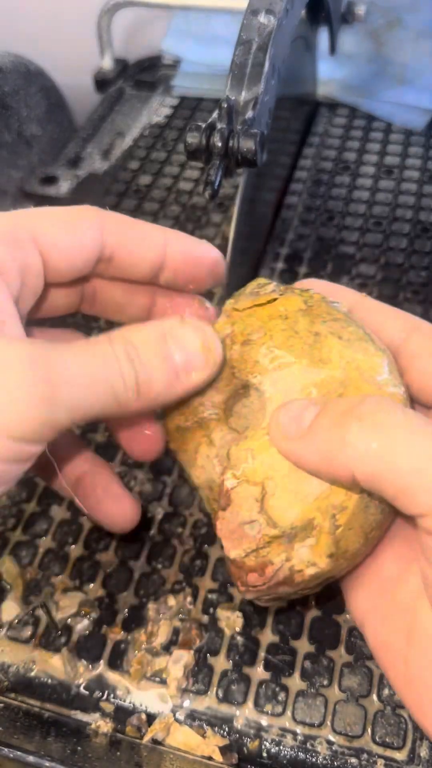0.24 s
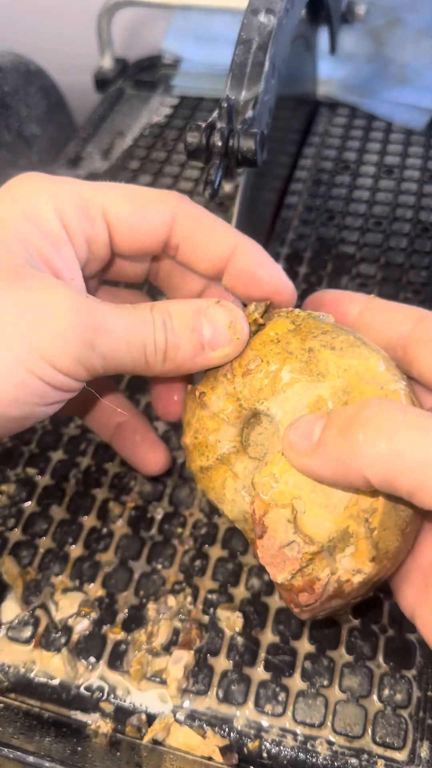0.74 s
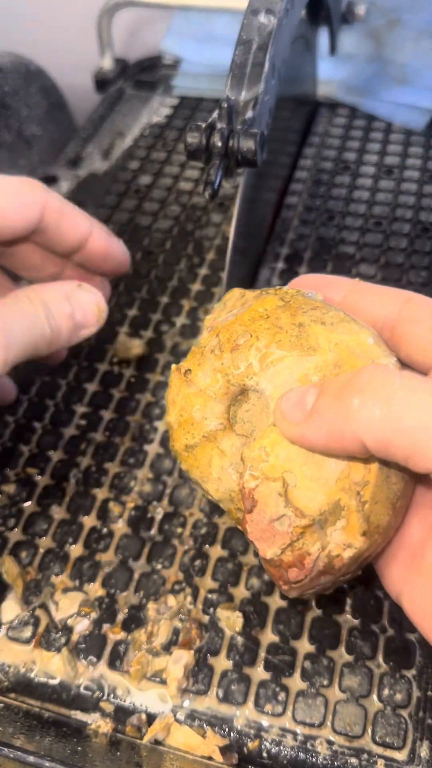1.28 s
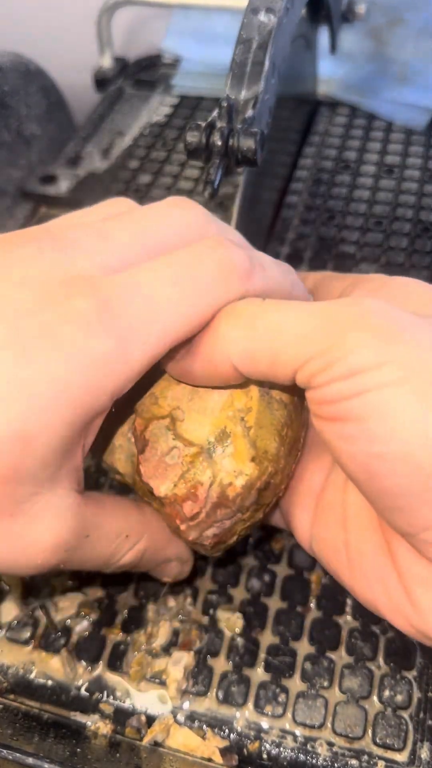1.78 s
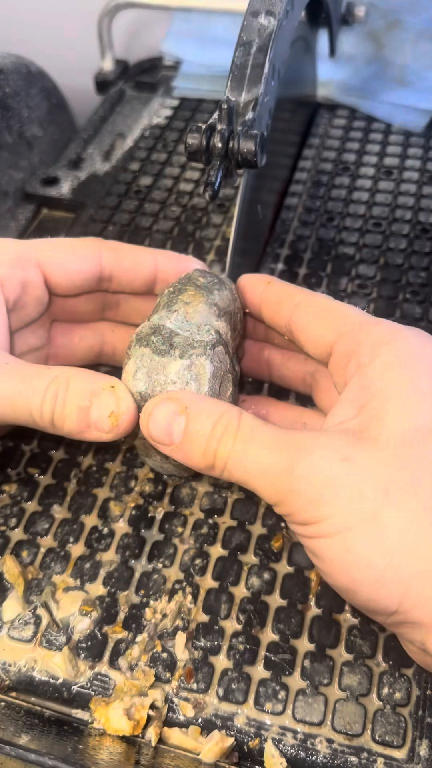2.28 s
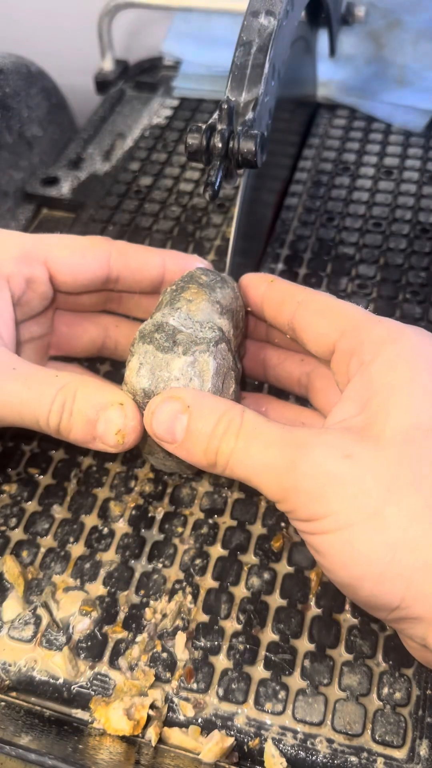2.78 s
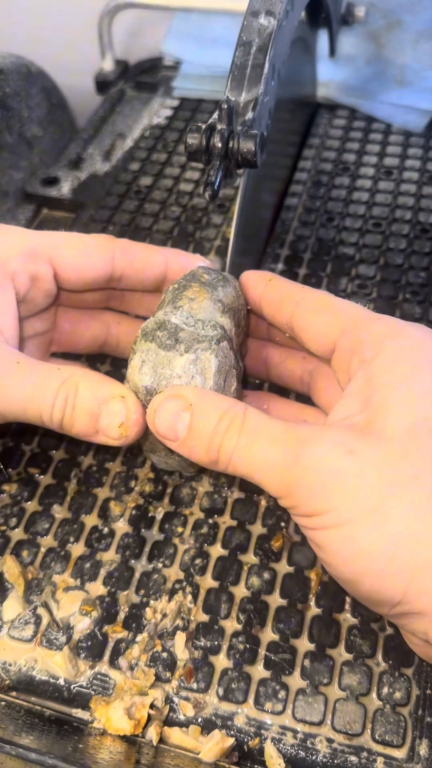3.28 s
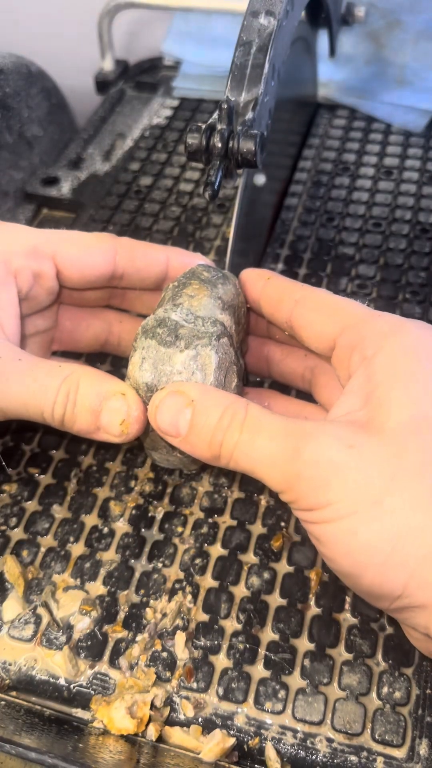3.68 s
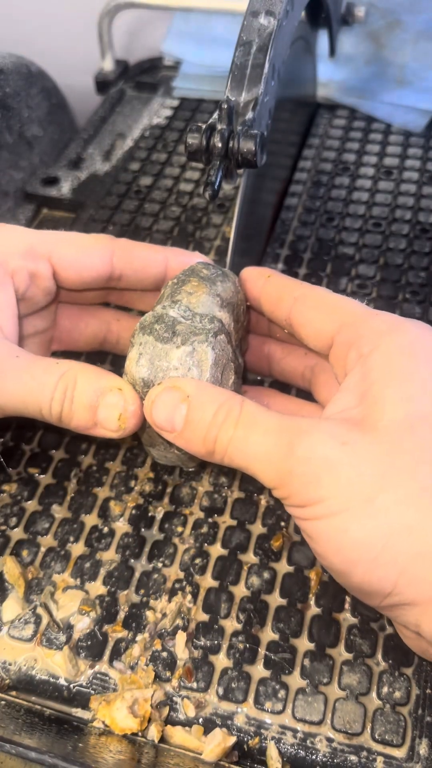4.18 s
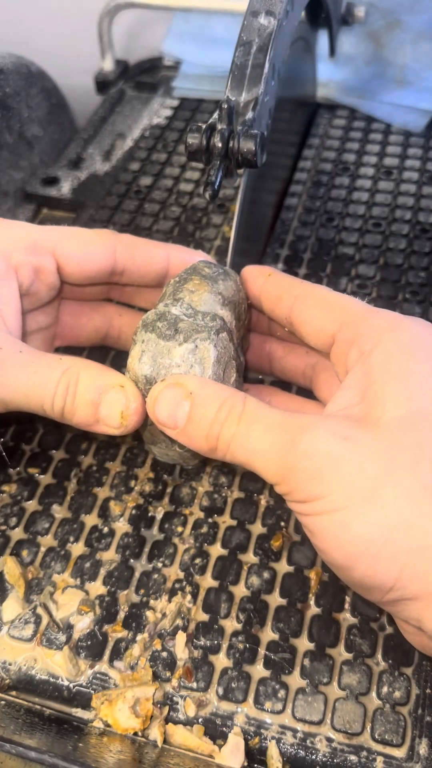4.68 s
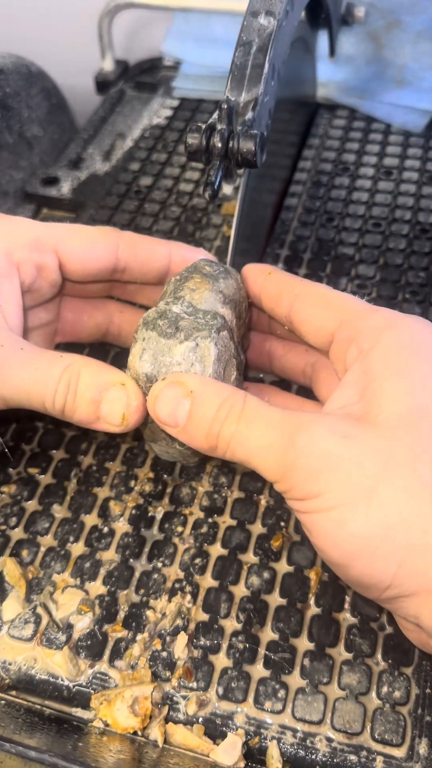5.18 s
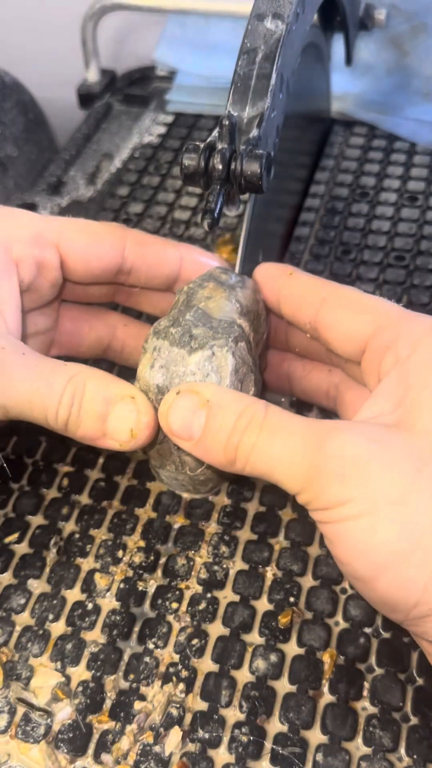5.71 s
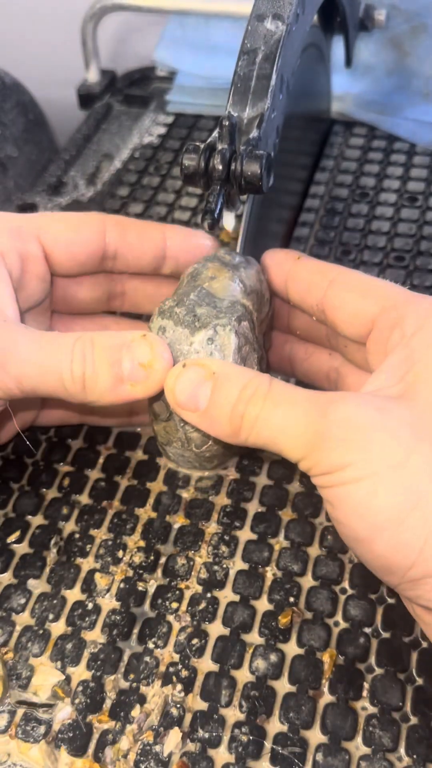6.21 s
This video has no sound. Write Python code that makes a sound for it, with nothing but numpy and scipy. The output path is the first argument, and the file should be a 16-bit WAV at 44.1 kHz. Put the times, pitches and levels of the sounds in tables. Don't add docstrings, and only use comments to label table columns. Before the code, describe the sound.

In a workshop, a wet saw idles quietly with low hum and thin water hiss. A small chip bounces on the tray. The view jumps closer, a stone thuds onto the table and meets the blade: snapping grains, pulsing rasp, then a loud steady growl with bright sizzle. It cuts abruptly to a close air scribe, whining hard and chattering on stone.

```python
import sys
import numpy as np
from scipy import signal
from scipy.fft import rfft, irfft, next_fast_len
from scipy.io import wavfile
from scipy.ndimage import uniform_filter1d, map_coordinates

SR = 44100
rng = np.random.default_rng(int(sys.argv[2]) if len(sys.argv) > 2 else 0)


def digitize_waveform(pressure):
    field = np.atleast_2d(pressure).T
    bounded = np.clip(field, -1, 1)
    quanta = np.round(bounded * 32767).astype(np.int16)
    wavfile.write(sys.argv[1], SR, quanta)


def gain_from_decibels(decibels):
    exponent = np.asarray(decibels, float) / 20
    return 10 ** exponent


N = 284445
T = np.arange(N) / SR
CUT_START_S, TOOL_CHANGE_S = 2.517, 5.232
BITE_S = 2.6
TURNS_PER_S = 29.72
# freq_hz, density_db
SIZZLE_SHAPE = [(9000, -29), (10000, -12.5), (11600, -12.5), (12400, -15), (13000, -7), (14000, -2.5),
                (15000, -6.5), (15700, -4)]


def unit(x):
    return x / np.sqrt(np.mean(x ** 2) + 1e-20)


def along(points, hz):
    f, v = np.transpose(points)
    return np.interp(np.log(hz + 1), np.log(f + 1), v)


def curves(rows):
    s, *cols = np.transpose(rows)
    return [np.interp(T, s, c) for c in cols]


def ramp(start_s, length_s):
    return np.clip((T - start_s) / length_s, 0, 1)


def wobble(knots_per_s):
    return map_coordinates(rng.standard_normal(int(N * knots_per_s / SR) + 4), [T * knots_per_s], order=1)


def filtered(x, response):
    m = next_fast_len(N + 8192)
    return irfft(rfft(x, m) * response(np.fft.rfftfreq(m, 1 / SR)), m)[..., :N]


def coloured(x, spectrum):
    return unit(filtered(x, lambda hz: gain_from_decibels(along(spectrum, hz))))


def patchy(depth_db):
    z = signal.stft(rng.standard_normal(N), nperseg=512)[2]
    field = uniform_filter1d(uniform_filter1d(rng.standard_normal(z.shape), 4, 0), 12, 1)
    return signal.istft(z * gain_from_decibels(depth_db * unit(field)), nperseg=512)[1][:N]


def ringing(x, modes):
    def response(hz):
        total = 0
        for k, (mode_hz, width_hz, db) in enumerate(modes):
            damping = 1j * hz * width_hz
            total = total + (-1) ** k * gain_from_decibels(db) * damping / (mode_hz ** 2 - hz ** 2 + damping)
        return total
    return unit(filtered(x, response))


def knocks(events, modes, crack, crack_s=.01):
    out, t = np.zeros(N + SR), np.arange(SR // 3) / SR
    onset = 1 - np.exp(-t / 0.00024)
    for s, db in events:
        ring = sum(gain_from_decibels(level + rng.normal(0, 3) - 60 * t / t60) * np.sin(2 * np.pi * hz * t)
                   for hz, level, t60 in modes)
        snap = crack * gain_from_decibels(-60 * t / crack_s) * rng.standard_normal(len(t))
        out[round(s * SR):][:len(t)] += gain_from_decibels(db) * onset * (ring + snap)
    return out[:N]


def ports(x, sum_gain, side_db, lean, spread_s):
    echo = rng.standard_normal(4096) * gain_from_decibels(-60 * np.arange(4096) / SR / spread_s)
    spectrum = rfft(echo, next_fast_len(N + 8192))
    echo_phase = spectrum / np.abs(spectrum)

    def smear(hz):
        in_phase = np.clip(along(lean, hz), -1, 1)
        return in_phase + np.sqrt(1 - in_phase ** 2) * echo_phase

    mid = filtered(x, lambda hz: gain_from_decibels(along(sum_gain, hz)))
    side = filtered(x, lambda hz: gain_from_decibels(along(side_db, hz)) * smear(hz))
    return np.array([mid - side, mid + side])


def idle():
    # freq_hz, level_db
    motor_lines = [(59.2, -63.5), (91.5, -76), (118.4, -96), (150.7, -50), (209.9, -58), (296.1, -60),
                   (613.7, -64), (850.6, -76), (1104, -69.5), (1314, -68)]
    # time_s, level_db
    hum_path = [
        [(0.0, -45), (0.04, -47), (0.49, -52), (1.38, -41.5), (2.02, -43), (2.07, -47)],
        [(2.077, -33), (2.103, -32.5), (2.85, -27.5)],
    ]
    # time_s, freq_hz, level_db
    bearing_path = [(1.2, 1253, -71), (1.634, 1259, -60.5), (2.264, 1230, -62), (2.5, 1270, -67)]
    # freq_hz, density_db
    frame_shape = [(22, -31), (40, -8), (70, -0.5), (120, 2.5), (200, 4), (300, -3), (420, -1), (620, -6.5),
                   (700, -10.5), (850, -5), (1000, -14.5), (1300, -10), (2500, -19.5), (3300, -26)]
    # freq_hz, density_db
    spray_shape = [(1200, -34), (2000, 0), (3300, -3.5), (4200, -3.5), (7500, -2.5), (8300, -2),
                   (10000, -0.5), (15700, -1.5)]
    jump_s, creep_db_per_s = 2.074, 1.5
    spray_db = np.where(T < jump_s, -54.5 + creep_db_per_s * T, -38)
    frame_db = np.where(T < jump_s, -52.5 + creep_db_per_s * T, -37.5)
    hum_hz = 150.8
    hum_db = curves(np.vstack(hum_path))[0] - 12 * ramp(3.3, 0.44)
    hum = gain_from_decibels(hum_db + 2.5 + .5 * wobble(20)) * np.sin(2 * np.pi * hum_hz * T)
    lines = np.zeros(N)
    for hz, db in motor_lines:
        if abs(hz - hum_hz) > 5:
            lines += gain_from_decibels(db + 2.0 * wobble(5.93)) * np.sin(2 * np.pi * hz * T + rng.uniform(0, 5.4))
    hz, db = curves(bearing_path)
    whistle = gain_from_decibels(db + 6.5 + wobble(12.0)) * ramp(0.99, 0.18) * np.sin(2 * np.pi * np.cumsum(hz) / SR)
    frame = gain_from_decibels(frame_db) * (gain_from_decibels(53.5) * lines + coloured(patchy(depth_db=1.2), frame_shape))
    spray = gain_from_decibels(spray_db) * coloured(patchy(depth_db=1.5), spray_shape)
    return hum + whistle + frame + spray


def handling():
    # start_s, peak_db
    bounces = [(0.871, -52), (1.134, -28.5), (1.141, -33), (1.149, -36), (1.164, -37), (1.209, -42),
               (1.219, -35), (1.244, -40), (1.289, -43), (1.299, -41)]
    # freq_hz, level_db, t60_s
    tray_modes = [(262, -0.5, 0.057), (530, -1, 0.086), (765, 5, 0.089), (1155, 6.5, 0.036),
                  (1400, 7, 0.03), (2020, 6, .04), (2280, -12, .04), (3060, -16, .03)]
    # freq_hz, gain_db
    dull_contact = [(150, 9), (300, 7), (2300, -4), (4500, -18), (8000, -28)]
    # start_s, level_db
    laid_down = [
        (2.08, -29.5),
        (2.112, -20.5),
        (2.125, -20),
    ]
    # freq_hz, level_db, t60_s
    table_modes = [(186, -7, 0.25), (260, -7.5, 0.1), (373, -12.5, 0.047), (580, -13, 0.085),
                   (2600, -21, 0.03)]
    # start_s, level_db
    pushes = [
        (2.97, -13),
        (3.03, -22),
        (3.36, -33),
        (4.23, -39),
        (5.22, -45),
    ]
    chip = knocks(bounces, tray_modes, crack=3.5, crack_s=0.12)
    chip = filtered(chip, lambda hz: gain_from_decibels(along(dull_contact, hz) - 15.0))
    chip += knocks([(1.243, -58), (1.247, -60)], [(2900, 0, .03), (4030, -2, .02)], crack=.5)
    stone = knocks(laid_down, table_modes, crack=0.18, crack_s=0.044)
    return chip + stone + knocks(pushes, [(32.1, 1, 0.046), (55.5, -22, .1)], crack=0)


def table_growl(growl_db, rattle_db, speed, turn, strike):
    # freq_hz, density_db
    growl_shape = [(24, -59), (40, -44), (59, -35), (193, 0.5), (242, -2), (322, -12.5), (340, -9.5),
                   (440, -12), (750, -120)]
    rattle_shape = [(190, -28), (320, -2.5), (442, -12), (540, 1.5), (664, -12), (1090, -13.5),
                    (1500, -17.5), (1950, -54), (3300, -120)]
    order_levels = [-57, -13.5, -7.5, -12.5, -3, 1, -4.5, -8, -9.5, -20, -10, -10, -13.5, -15, -9, -7.5,
                    -11.5, -11.5, -14]
    # time_s, freq_hz
    stone_paths = [
        [(3.5, 150), (3.57, 236), (4.45, 236), (4.5, 178), (4.78, 178), (4.81, 265)],
        [(3.45, 531), (3.55, 413), (4.2, 413), (4.23, 522), (4.78, 522), (4.81, 558)],
    ]
    # freq_hz, width_hz, level_db
    boom_modes = [(178.3, 17, 4.5), (210, 27, 1.5)]
    rough_share, smooth_share = .9, .23
    rough = smooth_share + (rough_share - smooth_share) * np.exp(-np.maximum(T - 3.45, 0) / .2)
    stone_hz = [curves(path)[0] for path in stone_paths]

    def lift_db(k):
        return sum(db * np.exp(-((k * speed - hz) / 20) ** 2) for db, hz in zip((5, 8), stone_hz))

    def order(k):
        phase = k * turn + rng.uniform(0, 2 * np.pi) + .45 * wobble(4)
        return gain_from_decibels(2.3 * wobble(5)) * np.cos(phase)

    def grind():
        return np.sqrt(rough) * unit(gain_from_decibels(2.1 * strike) * patchy(depth_db=2.0))

    low = sum(gain_from_decibels(db + lift_db(k)) * order(k) for k, db in enumerate(order_levels, start=2))
    low = low / np.sqrt(np.abs(uniform_filter1d(low ** 2, SR // 4)))
    high = unit(sum(order(k) for k in range(21, 48)))
    tonal = 1.295 * np.sqrt(1 - rough) * low
    noise = 0.51 * coloured(grind(), growl_shape)
    boom = 0.44 * (rough - smooth_share) / rough_share * ringing(grind(), boom_modes)
    rattle = coloured(grind() + 0.32 * np.sqrt(1 - rough) * high, rattle_shape)
    return gain_from_decibels(growl_db) * (tonal + noise + boom) + gain_from_decibels(rattle_db - 6.5) * rattle


def blade_grit(grit_db, feed_db, grains, depth):
    # freq_hz, density_db
    grit_shape = [(530, -11), (900, 0), (1090, -1), (1830, -8), (2040, -11.5), (2600, -2.5), (2840, -5),
                  (3500, -6.5), (4680, -10.5), (5220, -8), (9800, -7), (12700, -39), (21600, -120)]
    # freq_hz, width_hz, level_db
    blade_modes = [(2045, 50, 0), (2250, 25, -1), (2500, 30, -3), (2695, 15, 3), (3430, 60, -3),
                   (4460, 25, -1), (5072, 35, -4), (5400, 50, -4), (6020, 25, -2), (6140, 20, -1),
                   (6420, 20, -2), (6930, 40, -3), (7065, 18, 1), (8090, 30, -3)]
    bite_db = 1 * (T > BITE_S) * np.exp(-np.abs(T - BITE_S) / 0.046)
    blade = 0.88 * gain_from_decibels(-6 * depth + 1 * wobble(3.05)) * ringing(grains, blade_modes)
    grit = gain_from_decibels(grit_db + bite_db - 1.5) * (coloured(grains, grit_shape) + blade)
    coarse = filtered(grit, lambda hz: 1 / (1 + (hz / 1680) ** 6))
    return grit + (gain_from_decibels(0.16 * feed_db) - 1) * coarse


def rim_sizzle(sizzle_db, turn, strike, throb_db, skim):
    # freq_hz, width_hz, level_db
    rim_modes = [(12070, 60, -9), (12750, 50, -4), (13010, 50, -2), (13160, 50, -2), (13520, 70, -5),
                 (13850, 50, -2), (14020, 60, 1), (14330, 50, -5), (14620, 80, -5), (15040, 60, -5),
                 (15630, 60, -5)]
    lead_s, lead_db = .011, 1.8
    lead = 1 - np.mod(turn + 2 * np.pi * TURNS_PER_S * lead_s, 2 * np.pi) / (2 * np.pi)
    fine_db = throb_db * (0.31 * strike + lead_db * lead) + 0.83 * wobble(300)
    fine = gain_from_decibels(fine_db) * patchy(depth_db=2.0)
    fine = fine / np.sqrt(np.abs(uniform_filter1d(fine ** 2, SR // 8)))
    hiss = coloured(fine, SIZZLE_SHAPE) + .5 * ringing(fine, rim_modes)
    return gain_from_decibels(sizzle_db + 0.5 - 2 * skim) * hiss


def blade_sing(depth):
    # freq_hz, level_db, peak_s, rise_s, fade_db_per_s
    hz, db, peak_s, rise_s, fade_db_per_s = (2034, -29, 2.545, .025, 12)
    fade_db = fade_db_per_s * np.maximum(T - peak_s, 0) + 5 * ramp(BITE_S, 0.11) + 12 * depth
    sing_db = db - fade_db + 3.0 * wobble(45.27)
    return gain_from_decibels(sing_db) * ramp(peak_s - rise_s, rise_s) * np.sin(2 * np.pi * hz * T + 1.1 * wobble(70))


def guard_buzz(grains, skim):
    # freq_hz, width_hz, level_db
    guard_modes = [(611, 14, 0)]
    return gain_from_decibels(-37) * skim * ramp(CUT_START_S, 0.041) * ringing(grains, guard_modes)


def torn_grains():
    # start_s, peak_db
    snap_events = [(2.5202, -24), (2.555, -4), (2.5796, -9), (2.612, -2), (2.655, 3), (2.6889, -7),
                   (2.7232, 2), (2.7567, -7), (2.7804, -1), (2.8211, -8), (2.848, -9), (2.88, -7),
                   (2.9139, -6), (2.9338, -2)]
    snaps = knocks(snap_events, [(13700, -4, 0.011)], crack=1.1, crack_s=0.017)
    return filtered(snaps, lambda hz: gain_from_decibels(along(SIZZLE_SHAPE, hz)))


def cutting():
    # time_s, pressure_db
    feed_path = [(2.52, -16.5), (2.6, -15.5), (2.7, -12), (2.81, -11), (2.85, -2), (2.92, -0.5), (3.3, 3),
                 (3.55, 1.5), (4.15, -4), (4.25, 1), (5.07, -2), (5.22, -0.5)]
    # level_db, pressure_share, change_by_end_db
    layers = [
        (-17, 0.95, -0.5),
        (-19, 0.96, -2.5),
        (-23, 0.34, -5.5),
        (-14.5, 0.32, -2.5),
    ]
    feed_db, = curves(feed_path)
    progress = ramp(CUT_START_S, TOOL_CHANGE_S - CUT_START_S)
    growl_db, rattle_db, grit_db, sizzle_db = [db + share * feed_db + end_db * progress
                                               for db, share, end_db in layers]
    speed = TURNS_PER_S - .15 * (T - CUT_START_S)
    turn = 2 * np.pi * np.cumsum(speed) / SR
    turn = turn - turn[round(2.657 * SR)]
    strike = np.cos(turn) + .35 * np.cos(2 * turn - .6) + .3 * wobble(30)
    skim = np.exp(-np.maximum(T - 2.9, 0) / .15)
    throb_db = 1.4 + 5.6 * skim
    depth = ramp(3.32, 0.74)
    grains = gain_from_decibels(.3 * throb_db * strike + 1.5 * wobble(400)) * patchy(depth_db=1.6)
    saw = table_growl(growl_db, rattle_db, speed, turn, strike)
    saw = saw + blade_grit(grit_db, feed_db, grains, depth)
    saw = saw + rim_sizzle(sizzle_db, turn, strike, throb_db, skim)
    saw = saw + blade_sing(depth) + guard_buzz(grains, skim)
    return saw * ramp(CUT_START_S - .004, 0.0037) + torn_grains()


def scribe():
    # time_s, sixth_overtone_hz, level_db
    whine_path = [(5.232, 1759, -18.5), (5.264, 1753, -19), (5.37, 1744, -19), (5.43, 1744, -18),
                  (5.588, 1735, -19), (5.64, 1742, -20), (5.965, 1756, -19), (6.0, 1755, -22.5),
                  (6.04, 1775, -27.5), (6.066, 1768, -18.5), (6.085, 1755, -20), (6.326, 1731, -16.5),
                  (6.365, 1757, -18.5), (6.4, 1743, -17.5), (6.45, 1728, -17)]
    # freq_hz, level_db
    exhaust_shape = [(6400, -34), (8000, -21.5), (10000, -29.5), (12000, -27), (14000, -31.5),
                     (15700, -33.5)]
    # freq_hz, density_db
    chatter_shape = [(250, -90), (400, -39), (650, -25), (1300, -16), (1500, -4), (1800, 0.5), (2600, -3),
                     (3300, -9), (5200, -4), (6300, -14), (9000, -14), (12000, -19.5), (14000, -19),
                     (15700, -28)]
    scrape_shape = [(300, -90), (700, -28), (1300, -10), (1600, 0), (2600, -2), (3200, -20), (5000, -18),
                    (6500, -26), (15700, -34)]
    # start_s, chatter_db, high_overtones_db
    passes = [
        (5.635, -14.5, -7),
        (6.06, -18, -4),
    ]
    # time_s, scrape_db, half_length_s
    skids = [
        (6.025, 0, .042),
        (6.366, -6, .02),
    ]
    # start_s, level_db
    catches = [
        (6.004, -27),
        (6.016, -27),
        (6.056, -30),
        (6.078, -23),
    ]
    # start_s, level_db
    hose_drags = [
        (5.33, -83),
        (5.37, -84),
        (5.53, -82),
    ]
    # multiple, level_db
    loose_db = [(1, -42), (2, -29), (3, -16), (4, -15), (5, -16), (6, 0), (7, -1), (8, -11), (9, -9),
                (10, -16), (11, -24), (12, -13), (13, -5), (14, -12), (15, -16), (16, -9), (17, -16),
                (18, -19), (19, -8), (20, -10), (21, -25), (22, -19)]
    free_db = [(1, -51), (2, -29), (3, -21), (4, -14), (5, -17), (6, 0), (7, -3), (8, -10), (9, -11),
               (10, -14), (11, -17), (12, -16), (13, -13), (14, -17), (15, -21), (16, -10), (17, -18),
               (18, -22), (19, -22), (20, -12), (21, -31), (22, -24)]
    cutting_db = [(1, -56), (2, -27), (3, -16), (4, -15), (5, -9), (6, 0), (7, -2), (8, -6), (9, -12),
                  (10, -18), (11, -16), (12, -22), (13, -20), (14, -19), (15, -24), (16, -25), (17, -11),
                  (18, -14), (19, -21), (20, -17), (21, -32), (22, -32)]
    second_pass_db = [(1, -58), (2, -23), (3, -23), (4, -21), (5, -14), (6, 0), (7, -14), (8, -12),
                      (9, -12), (10, -13), (11, -23), (12, -15), (13, -20), (14, -21), (15, -21), (16, -18),
                      (17, -16), (18, -20), (19, -16), (20, -21), (21, -22), (22, -29)]
    last_grip_db = [(1, -41), (2, -21), (3, -21), (4, -23), (5, -18), (6, 0), (7, -10), (8, -12), (9, -16),
                    (10, -7), (11, -20), (12, -12), (13, -10), (14, -15), (15, -25), (16, -21), (17, -14),
                    (18, -19), (19, -15), (20, -21), (21, -24), (22, -28)]
    sixth_hz, level_db = curves(whine_path)
    (first_s, first_db, dull_db), (second_s, second_db, bright_db) = passes
    on, again = ramp(first_s - .02, 0.021), ramp(second_s, 0.037)
    loose, last = 1 - ramp(5.39, .05), ramp(6.37, .02)

    def stage(free, first, second):
        return free + (first - free) * on + (second - first) * again

    chatter_db = stage(-25, first_db, second_db) + 8 * loose + 1.0 * wobble(14)
    scrape = sum(gain_from_decibels(db - 10 * ((T - s) / half_s) ** 4) for s, db, half_s in skids)
    scrape = np.clip(scrape, 0, .97)
    scatter = .035 * gain_from_decibels(1.7 * (chatter_db + 11)) + .03 * scrape
    beat = 2 * np.pi * np.cumsum(sixth_hz / 6) / SR + scatter * wobble(200)
    grips = [dict(rows) for rows in (loose_db, free_db, cutting_db, second_pass_db, last_grip_db)]
    tone = np.zeros(N)
    for k in range(1, 55):
        db = along(exhaust_shape, 290 * k) + rng.normal(0, 3.7) + 0.91 * loose
        db = db + stage(0, dull_db, bright_db)
        if k <= 22:
            start, free, first, second, end = [grip.get(k, -50) - grip[6] for grip in grips]
            db = stage(free, first, second) + (start - free) * loose + (end - second) * last
            db = db - 12 * (ramp(5.82, 0.042) - again) * (k == 7)
        db = db + (1.2 + .07 * k) * wobble(9) * (k != 6)
        db = db - 10 * last * (k == 1)
        db = db - 16 * scrape ** 2 * (k > 3)
        tone += gain_from_decibels(db) * np.cos(k * beat + rng.uniform(0, 6.8))

    def grit():
        return gain_from_decibels(3.8 * np.cos(beat) + 3.3 * wobble(150)) * patchy(depth_db=2.0)

    chatter_gain = 1.96 * (1 - 0.47 * scrape) * gain_from_decibels(chatter_db + 2.6 * wobble(35))
    noise = chatter_gain * coloured(grit(), chatter_shape)
    noise = noise + 0.97 * scrape * coloured(grit(), scrape_shape)
    ticks = knocks(catches, [(1827, -0.031, 0.038), (2368, -2, 0.024), (2630, -2, .03)], crack=0.24)
    ticks = filtered(ticks, lambda hz: 1 / (1 + (900 / (hz + 1)) ** 6))
    hose = knocks(hose_drags, [(190, 3, 0.12), (290, 19, 0.091), (397, 33, 0.048)], crack=0)
    return gain_from_decibels(level_db) * (0.99 * tone + noise) * (T > TOOL_CHANGE_S) + ticks + hose


def scene():
    # freq_hz, gain_db
    saw_sum = [(9000, -0.5), (9800, -6), (10400, -11), (11000, -17.5), (11600, -11.5), (11800, -1.5)]
    # freq_hz, gain_db
    saw_difference = [(60, -16), (150, -17), (300, -8), (500, -11.5), (800, 1), (3300, -1.5), (5500, -2),
                      (7800, -2), (8800, -10), (9800, -4), (11650, 1), (11850, -22)]
    # freq_hz, share
    cut_lean = [(60, .1), (160, .85), (300, .1), (500, .3), (1200, -.1), (5500, -.55), (9000, -.2)]
    # freq_hz, side_minus_mid_db
    scribe_side = [(60, -12), (110, -5), (200, -18), (380, -23), (700, -27), (1290, -21), (2380, -10),
                   (4400, -18.5), (8120, -0.5), (15000, 0)]
    sawing = T < TOOL_CHANGE_S
    running = ports((idle() + handling()) * sawing, saw_sum, saw_difference,
                    [(150, 0.37), (1200, -0.38)], spread_s=0.13)
    saw = ports(cutting() * sawing, saw_sum, saw_difference, cut_lean, spread_s=0.11)
    near_lean = [(1200, 0.37), (2000, 0.95), (3300, -1.14), (5500, 0.52), (8000, -0.1)]
    near = ports(scribe(), [(100, 0)], scribe_side, near_lean, spread_s=0.047)
    comb = rng.standard_normal((2, 600))

    def reflections(hz):
        ripple = np.array([[map_coordinates(row, [hz / 36])] for row in comb])
        ripple_db = 2.8 * np.clip(hz / 1500 - 1, 0, 1) * ripple
        null_db = -14 * np.exp(-((hz - 2920) / 90) ** 2)
        return gain_from_decibels(ripple_db + null_db)

    cutting_now = (T > CUT_START_S) * sawing
    before, after = filtered(running * cutting_now + saw, reflections)
    shift = ramp(3.5, 0.37)
    return running * (1 - cutting_now) + (1 - shift) * before + shift * after + near


def starved(pair, fickle_db):
    # freq_hz, ratio_db
    weaker_limits = [
        [(1400, -13.5), (8000, -3.5), (10000, -6), (16000, -9.5)],
        [(1400, -20.5), (6000, -20.5), (8000, -8.5), (16000, -11)],
    ]
    sum_difference = np.array([pair[0] + pair[1], pair[0] - pair[1]]) / 2
    hz, _, z = signal.stft(sum_difference, SR, nperseg=2048, window="cosine")
    edges = np.arange(64, 1025, 16)
    power = np.add.reduceat(np.abs(z) ** 2, edges, axis=1)
    mood = uniform_filter1d(rng.standard_normal(power.shape), size=2, axis=1)
    mood = uniform_filter1d(mood, size=2, axis=2)
    limit_db = np.array([along(table, hz[edges]) for table in weaker_limits])[..., None]
    limit_db = limit_db + fickle_db * unit(mood)
    kept = power > gain_from_decibels(2 * limit_db) * power[::-1]
    z[:, 64:] *= np.repeat(kept, 16, axis=1)[:, :961]
    mid, side = signal.istft(z, nperseg=2048, window="cosine")[1][:, :N]
    return np.array([mid + side, mid - side])


def roll_off(x):
    return signal.sosfilt(signal.butter(12, 16550, fs=SR, output="sos"), x)


def record(dry):
    soft = dry / (1 + np.abs(dry / .95) ** 4) ** (1 / 4)
    limited = filtered(soft, lambda hz: hz < 15750)
    mix = starved(limited, fickle_db=4.0)
    return roll_off(mix)


dry = scene()
out = record(dry)
digitize_waveform(out)
```